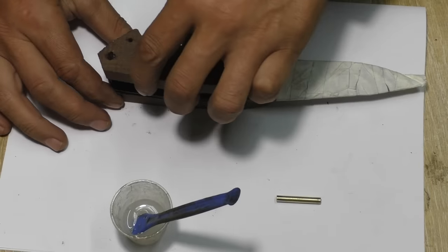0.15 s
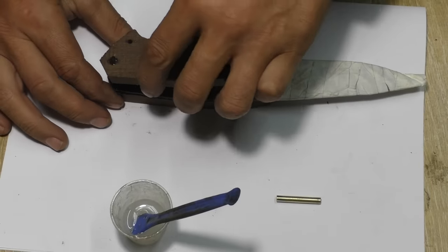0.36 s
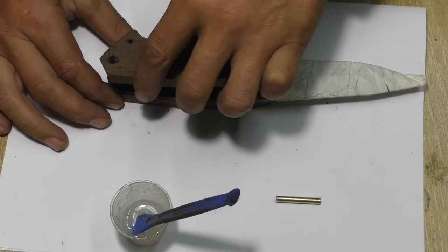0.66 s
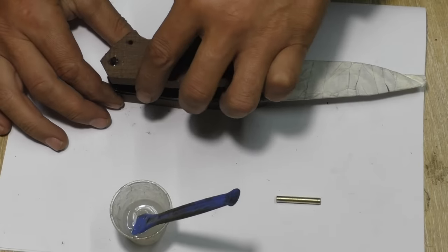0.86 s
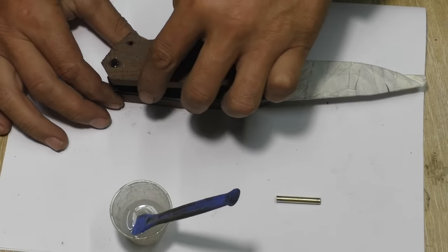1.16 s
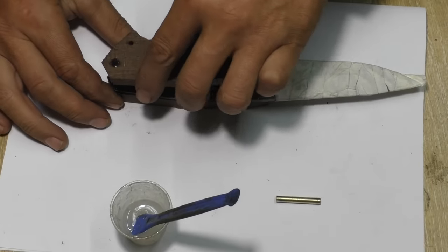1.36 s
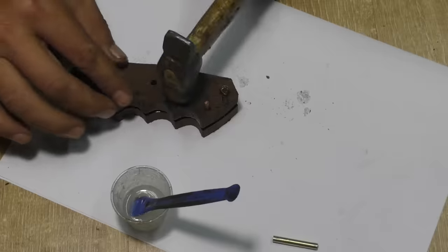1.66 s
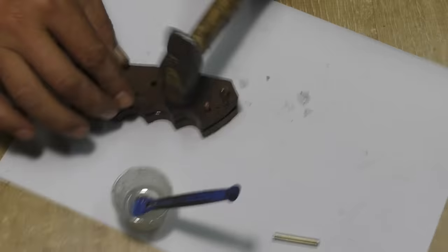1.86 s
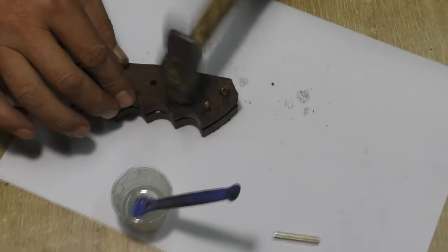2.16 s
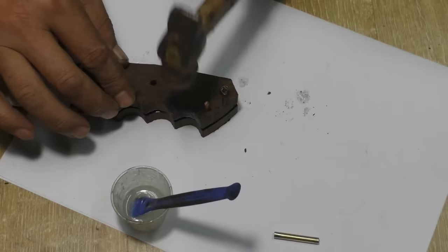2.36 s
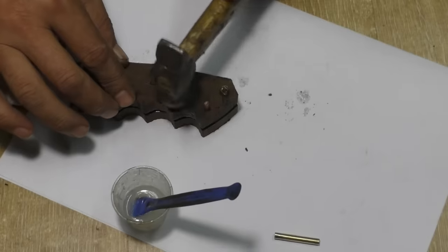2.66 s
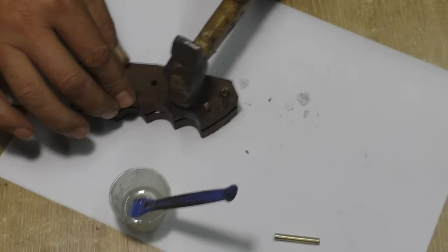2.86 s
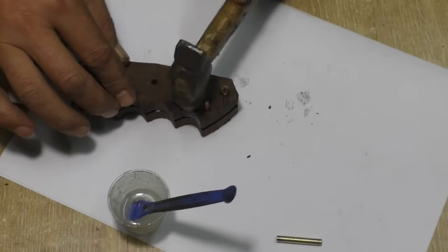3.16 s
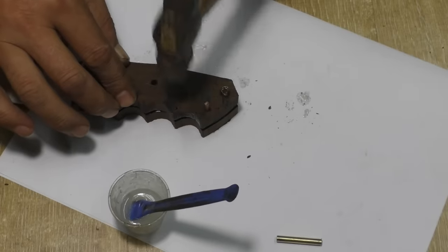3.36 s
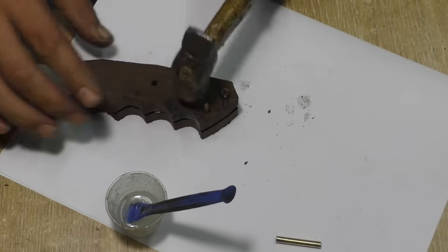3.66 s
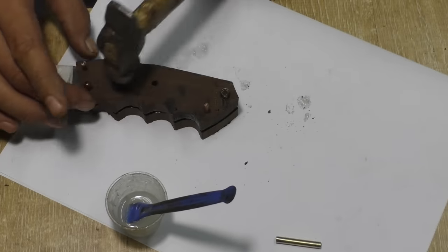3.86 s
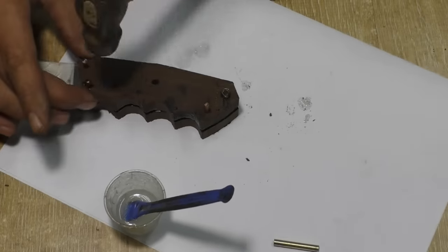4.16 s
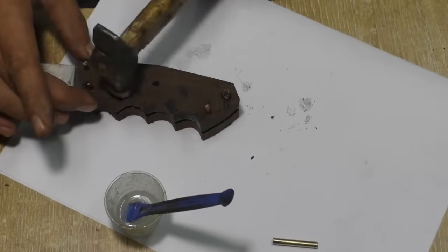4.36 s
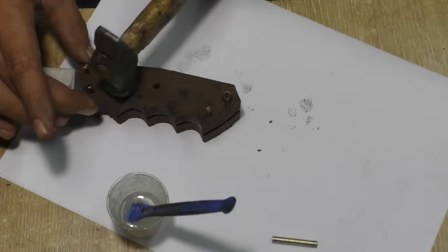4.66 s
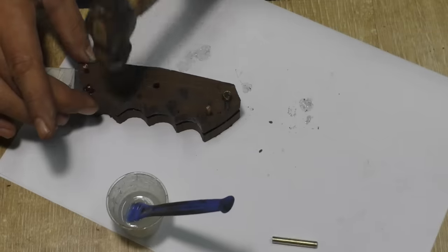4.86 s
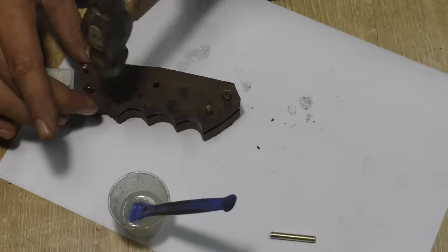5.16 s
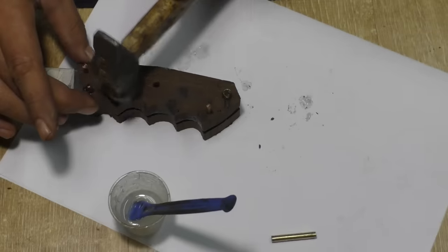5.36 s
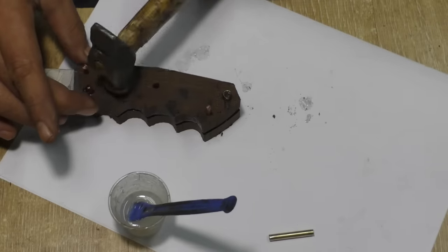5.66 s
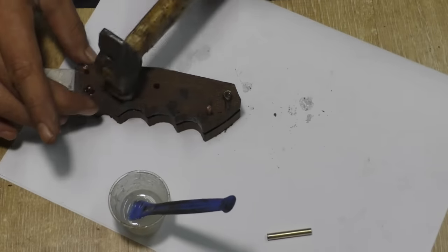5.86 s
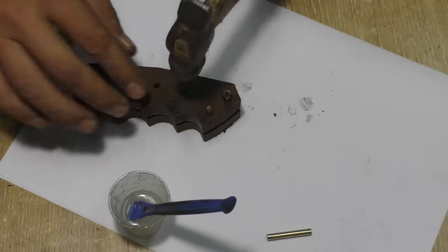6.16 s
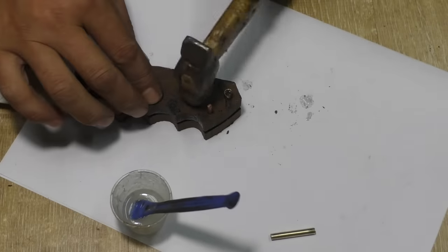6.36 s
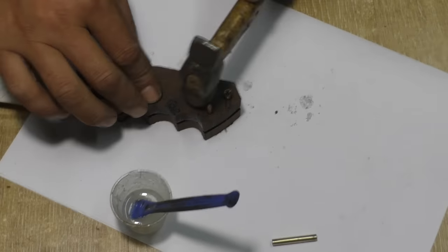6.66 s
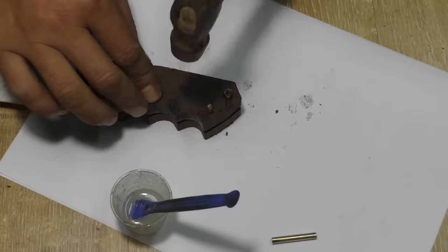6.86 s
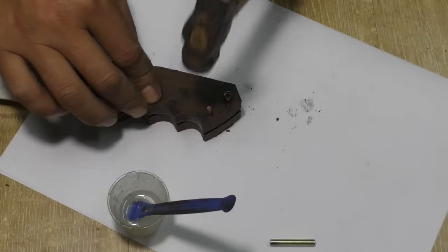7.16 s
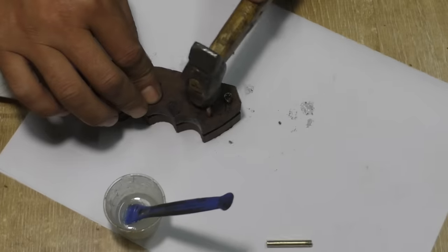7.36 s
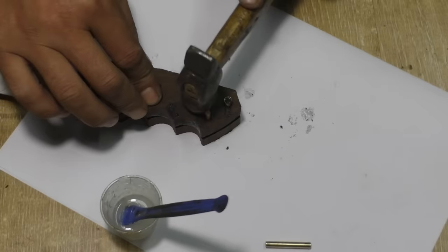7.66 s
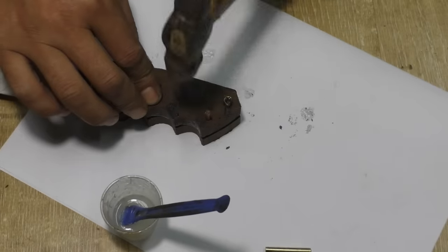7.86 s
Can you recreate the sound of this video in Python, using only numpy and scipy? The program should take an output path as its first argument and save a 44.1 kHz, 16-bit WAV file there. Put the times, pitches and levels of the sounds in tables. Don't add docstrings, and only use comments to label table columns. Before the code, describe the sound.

Very quiet at first: fingers squeeze a knife handle on a paper-covered bench, with faint creaks, skin rubbing, tiny ticks and a small slip. Then a small hammer suddenly taps the handle's pins, about three blows a second, in three runs each opening with a softer tap. Every blow is a short, hard metallic clack with a low bench knock, slightly overloaded at the close microphone, and a brief small-room echo.

```python
import sys
import numpy as np
from scipy import signal
from scipy.io import wavfile
from scipy.ndimage import uniform_filter1d

SR = 44100
rng = np.random.default_rng(int(sys.argv[2]) if len(sys.argv) > 2 else 0)


def ratio(d):
    e = np.asarray(d, float) / 20
    return 10 ** e


def wav_out(sig):
    wavfile.write(sys.argv[1], SR, np.round(np.clip(np.atleast_2d(sig).T, -1, 1) * 32767).astype(np.int16))


N = 353682
T = np.arange(N) / SR

# (time [s], peak [dB], contact hardness [dB], force into bench and room [dB])
TAPS = [(1.61, -7, -29.5, -9), (1.888, 2, -15, -2.5), (2.215, -2, -12, -2.5), (2.544, -3.5, -17.5, -2),
        (2.854, -2, -16.5, -1.5), (3.159, -0.5, -13, -1.5), (3.437, -4, -13.5, -1.5),
        (3.959, -9.5, -29, -9.5), (4.269, 2.5, -14.5, -3.5), (4.632, -1, -12.5, -2.5),
        (4.968, 0.5, -12, -3), (5.26, -3, -13.5, -4), (5.544, -1.5, -11, -3.5), (5.828, 0.5, -14.5, -5),
        (6.3703, -9.5, -31, -11), (6.654, -3.5, -10.5, -2), (6.993, 0, -16, -1.5), (7.337, -2.5, -16, -2),
        (7.674, 0.5, -18, -3.5), (7.972, 1, -17.5, -2)]
# (time [s], level [dB])
TOUCHES = [
    (7.671, -12.5),
]
# (run end [s], favoured modes [Hz], their lift [dB], low bench modes [dB], jolt re blow [dB])
PINS = [
    (3.7, 1800, 0.5, -26.5, -1.5),
    (6.1, 2760, 9, -24, -11),
    (9, 1900, 4, -26.5, -2.5),
]
# (frequency [Hz], level [dB], t60 [s])
HANDLE_MODES = [(1070, -1.5, 0.051), (1187, -6, 0.035), (1314, -1.5, 0.028), (1550, -9, 0.014),
                (1670, -6.5, 0.044), (1930, -6.5, 0.019), (2089, 4.5, 0.014), (2318, -2, 0.023),
                (2583, -4, 0.027), (2986, -4.5, 0.029), (3400, -2, 0.0092), (3740, -0.9, 0.013),
                (4190, -1, 0.011), (4620, -4.5, 0.013), (6120, -9, 0.0097), (6600, -12.5, 0.0054),
                (7630, -10, 0.008), (8250, -6, 0.01), (9210, -6, 0.0086), (10170, -4, 0.0079),
                (11040, -3.5, 0.0086), (12000, -6.5, 0.0093), (13550, -7.5, 0.014), (14600, -8.5, .0075)]
# (frequency [Hz], negative = opposite phase so pairs beat; level [dB], t60 [s])
BENCH_MODES = [(104.5, 6, 0.27), (-113.6, 4, 0.35), (156, 12.5, 0.14), (228, 11, 0.077), (272, 9.5, 0.046),
               (319, 4, 0.2), (-363, 4.5, 0.27), (372.5, 12.5, 0.15), (393, 1.5, 0.28), (461, -3.5, 0.096)]
# (from [Hz], to [Hz], early level [dB], early t60 [s], late level [dB], late t60 [s],
# side re mid [dB])
ROOM_BANDS = [(185, 438, -11.5, 0.13, -29, 0.43, -13.5), (555, 880, -24.5, 0.17, -33.5, 0.36, -8.5),
              (990, 1500, 0, 0.05, -23, 0.36, -11), (1475, 2300, -6.5, 0.093, -24.5, 0.38, -9.5),
              (2260, 3400, -6, 0.071, -21, 0.33, -10), (3298, 4900, -9.5, 0.06, -22, 0.29, -7),
              (4800, 7000, -14.5, 0.061, -26, 0.29, -10.5), (7000, 9500, -15.5, .045, -29.5, 0.27, -15),
              (9600, 14000, -15, 0.038, -34, 0.26, -12), (12500, 14000, -26, .035, -39, .18, -9)]
# (start [s], rise [s], peak [dB], fall [dB/s])
PRESSES = [
    (0.05, 0.12, -62, 18),
    (0.335, 0.057, -47.5, 65),
    (0.6, 0.026, -59, 153),
    (1.09, 0.089, -46.5, 64),
    (1.36, 0.14, -54.5, 22),
]
# (start [s], rise [s], peak [dB], fall [dB/s])
RUBS = [
    (0.05, 0.084, -59.5, 60),
    (0.36, .1, -62, 15),
    (0.55, 0.065, -53.5, 100),
    (1.06, .018, -56.5, 150),
    (1.0, 0.26, -60, 17),
    (1.35, 0.13, -58.5, 50),
]
# (centre [Hz], width [Hz], level [dB])
CREAK_BANDS = [(392, 78, -0.5), (737, 72, 1), (900, 250, -0.5), (1240, 150, -0.5), (1570, 320, -4.5)]
# (time [s], level [dB])
SLIDES = [
    (3.936, -67),
    (5.12, -71.5),
    (6.295, -59),
    (6.355, -53),
]
# (time [s], peak [dB], centre [Hz])
GRIT_TICKS = [(0.5735, -38, 2640), (0.6217, -38.5, 3600), (0.66, -46, 4510), (0.7492, -52, 2860),
              (1.0766, -45, 3840), (1.722, -48, 4800), (6.4796, -48, 2060)]
# (time [s], peak [dB])
PAPER_TICKS = [(0.1294, -52), (0.409, -45), (0.4296, -43.5), (0.5132, -33), (0.724, -48.5), (0.844, -51.5),
               (1.0756, -35), (1.1703, -39.5), (1.2385, -40), (1.721, -50.5), (6.4094, -52), (6.4467, -43)]
# (frequency [Hz], density [dB/Hz])
AIR_FIRST = [(15, -50), (25, -24.5), (70, -8.5), (150, -10.5), (422, -22.5), (470, -23), (600, -34.5),
             (651, -30.5), (1180, -22), (1320, -21), (2040, -27), (5130, -41), (15200, -38.5), (16500, -45)]
AIR_SECOND = [(15, -42), (25, -12), (27, -14.5), (76, -12), (238, -16.5), (313, -15.5), (368, -23),
              (470, -20.5), (584, -32.5), (1060, -23.5), (2820, -33.5), (5130, -51.5), (15200, -49),
              (16500, -47)]
# (frequency [Hz], side re mid [dB])
AIR_SIDE = [(60, -11), (110, -9.5), (200, -9), (380, -17), (700, -11.5), (1290, -8), (2380, -2.5),
            (4400, 2.5), (8120, -16), (15000, 5)]

FULL_HARD_DB = -15.5
SCENE_CHANGE_S, HARD_START_S = 1.53, 1.89


def band(x, lo_hz, hi_hz, order=2):
    return signal.sosfilt(signal.butter(order, [lo_hz, min(hi_hz, 0.45 * SR)], "band", fs=SR, output="sos"), x)


def unit(x):
    return x / np.sqrt(np.mean(x ** 2))


def on_log(points, hz):
    points_hz, points_db = np.transpose(points)
    return np.interp(np.log(hz), np.log(points_hz), points_db)


def fade(t60_s, seconds):
    return np.exp(-np.log(1000) * np.arange(int(seconds * SR)) / SR / t60_s)


def ring(hz, db, t60_s, seconds, late_s=0):
    t = (np.arange(int(seconds * SR)) / SR - np.reshape(late_s, (-1, 1))).clip(0)
    hz, db, t60_s = (np.reshape(v, (-1, 1)) for v in (hz, db, t60_s))
    return np.sum(ratio(db) * np.sin(2 * np.pi * hz * t) * np.exp(-np.log(1000) * t / t60_s), axis=0)


def add(track, s, x):
    i = int(s * SR)
    track[..., i:i + x.shape[-1]] += x[..., :track.shape[-1] - i]


def walk(rate_hz):
    hold = int(SR / rate_hz)
    steps = np.repeat(rng.standard_normal(N // hold + 1), hold)
    return 0.99 * uniform_filter1d(uniform_filter1d(steps, hold), hold)[:N]


def starve_db(hz, hard_db):
    return hard_db * np.clip(np.log2(hz / 1200) / 2.14, 0, 1)


def softness_db(hard_db, knee_db):
    return min(hard_db - FULL_HARD_DB + knee_db, 0)


def strike(hard_db, pin_hz=2000, pin_db=0):
    chatter_s, pin_octaves = 0.000405, 0.23
    hz, db, t60_s = np.transpose(HANDLE_MODES)
    level_dev_db, tune_dev, chatter_dev = rng.standard_normal((3, len(hz)))
    pin_lift_db = pin_db * np.exp(-(np.log2(hz / pin_hz) / pin_octaves) ** 2)
    db = db + starve_db(hz, hard_db) + level_dev_db + pin_lift_db
    x = ring(hz * (1 + 0.012 * tune_dev), db, t60_s, 0.05, late_s=chatter_s * np.abs(chatter_dev))
    x = band(x, 850, 18000, order=4)
    return x / np.abs(band(x, 800, 3600)).max()


def bench_ring(low_db, force_db):
    hz, db, t60_s = np.transpose(BENCH_MODES)
    level_dev, tune_dev = rng.standard_normal((2, len(hz)))
    drive_db = np.where(abs(hz) < 290, low_db + 0.65 * force_db, -19 + 1.6 * force_db)
    return ring(hz * (1 + 0.0059 * tune_dev), db + drive_db + 2.5 * level_dev, t60_s, 0.5)


def microphone_jolt():
    hz = np.array([135, 235, 340]) + np.array([15, 30, 30]) * rng.standard_normal(3)
    return rng.choice([-1, 1]) * ring(hz, [-4, -2.5, -4], [0.045, 0.035, 0.03], 0.058)


def hammer():
    handle, bench, jolt = np.zeros((3, N))
    for s, peak_db, hard_db, force_db in TAPS:
        _, pin_hz, pin_db, low_db, jolt_db = next(pin for pin in PINS if s < pin[0])
        contact_db = hard_db - FULL_HARD_DB + 0.72 * softness_db(hard_db, 4.5)
        add(handle, s + 0.00021, ratio(peak_db + 8.5) * strike(contact_db, pin_hz, pin_db))
        add(bench, s + 0.0015, bench_ring(low_db, force_db))
        add(jolt, s + 0.0023, ratio(peak_db + jolt_db) * microphone_jolt())
    for s, touch_db in TOUCHES:
        add(handle, s, ratio(touch_db) * strike(-13.5))
    return handle, bench, jolt


def swells(rows):
    total = 0
    for s, rise_s, peak_db, fall_db_per_s in rows:
        below_db = np.maximum(13.5 * (1 - (T - s) / rise_s), fall_db_per_s * (T - s - rise_s))
        total = total + ratio(peak_db - below_db) * (T > s)
    return total


def creak():
    slips = rng.standard_normal(N) * (rng.random(N) < 0.03)
    return unit(sum(ratio(db) * unit(band(slips, hz - width_hz / 2, hz + width_hz / 2))
                    for hz, width_hz, db in CREAK_BANDS))


def rustle():
    grains = rng.standard_normal(N) * ratio(3.2 * rng.exponential(size=N) + 3.3 * walk(60))
    bright = unit(band(grains, 7000, 15000, order=1))
    return unit(bright + ratio(-1.5) * unit(band(grains, 1770, 5600)))


def finger_slip():
    t = T - 1.46
    sweep = np.sin(2 * np.pi * (1026 - 3500 * t / 2) * t)
    return ratio(-52 + 4.4 * walk(120)) * sweep * np.exp(-(t / 0.036) ** 2)


def tick(peak_db, hz, t60_s):
    seconds = 0.05
    burst = rng.standard_normal(int(seconds * SR)) * fade(t60_s, seconds)
    x = band(burst, hz / 1.4, hz * 1.4, order=1)
    return ratio(peak_db - 1.5) * x / np.abs(x).max()


def fingers():
    friction = rustle()
    x = ratio(-3.5) * (swells(PRESSES) * creak() + swells(RUBS) * friction) * (T < SCENE_CHANGE_S)
    x += finger_slip()
    for s, db in SLIDES:
        x += friction * ratio(db) * np.exp(-((T - s) / 0.016) ** 2)
    for s, peak_db, hz in GRIT_TICKS:
        add(x, s, tick(peak_db, hz, t60_s=0.035))
    for s, peak_db in PAPER_TICKS:
        add(x, s, tick(peak_db, 11260, t60_s=0.01))
    return x


def workshop():
    gap_s = 0.002
    out, white = 0, rng.standard_normal((2, N))
    for k, (lo_hz, hi_hz, early_db, early_t60_s, late_db, late_t60_s, side_db) in enumerate(ROOM_BANDS):
        early, late = ratio(early_db) * fade(early_t60_s, 0.6), ratio(late_db) * fade(late_t60_s, 0.6)
        decay = early ** 2 + late ** 2
        power = np.zeros(N)
        for s, _, hard_db, force_db in TAPS:
            treble_db = starve_db(np.sqrt(lo_hz * hi_hz), 1.67 * softness_db(hard_db, 4.5))
            add(power, s + gap_s, decay * ratio(force_db + treble_db) ** 2)
        noise = unit(band(white[:, ::(-1) ** k], lo_hz, hi_hz, order=3))
        out = out + noise * np.sqrt(np.abs(uniform_filter1d(power, size=40))) * ratio([[0], [side_db]])
    return out


def air_db():
    blows_s = np.array(TAPS)[:, 0]
    since_s = T - blows_s[np.maximum(np.searchsorted(blows_s, T) - 1, 0)]
    later_db = -48.5 - 1.62 * (T - HARD_START_S) - 12.5 * since_s
    return np.where(T < HARD_START_S, -55, later_db)


def air():
    out, white, first = 0, rng.standard_normal((2, N)), T < HARD_START_S
    share = np.where(T < SCENE_CHANGE_S, 1, 0.54) * first
    for k, hz in enumerate(28 * 2 ** np.arange(0, 9.3, 0.5)):
        noise = unit(band(white[:, ::(-1) ** k], hz / 2 ** 0.25, hz * 2 ** 0.25, order=3))
        colour_db = share * on_log(AIR_FIRST, hz) + (1 - share) * on_log(AIR_SECOND, hz)
        db = colour_db + 10 * np.log10(hz) + 2.0 * walk(7.6)
        out = out + ratio(db) * noise * ratio([[0], [on_log(AIR_SIDE, hz)]])
    out[1, ~first] *= ratio(-6.5)
    return ratio(air_db()) * np.where(first, out / out[0, first].std(), out / out[0, ~first].std())


def scene():
    port_lag = 40
    handle, bench, jolt = hammer()
    hands = fingers()
    mid, side = workshop() + air()
    mid = mid + handle + bench + hands + 0.3 * jolt
    side = side + 0.7 * jolt - 0.067 * bench + 0.11 * hands
    side[port_lag:] += 0.4 * handle[:-port_lag]
    return np.array([mid + side, mid - side])


def ducking_db():
    duck_db, attack_s, release_s = 16.5, 0.0036, 0.19
    gain_db = np.zeros(N)
    for s, _, hard_db, _ in TAPS:
        depth_db = duck_db + 0.57 * softness_db(hard_db, 6.5)
        back_s = attack_s + release_s * depth_db / duck_db
        gain_db = np.minimum(gain_db, np.interp(T - s, [0, attack_s, back_s], [0, -depth_db, 0]))
    return gain_db


def top_cut(x):
    return signal.sosfilt(signal.butter(12, 16980, fs=SR, output="sos"), x)


def record(dry):
    clipped = band(0.95 * np.tanh(1.1 * dry * ratio(ducking_db())), 22, 17000, order=1)
    dipped = clipped - 0.33 * band(clipped, 468, 1086, order=1)
    mix = band(dipped, 5, 16300, order=5)
    return top_cut(mix)


dry = scene()
out = record(dry)
wav_out(out)
```